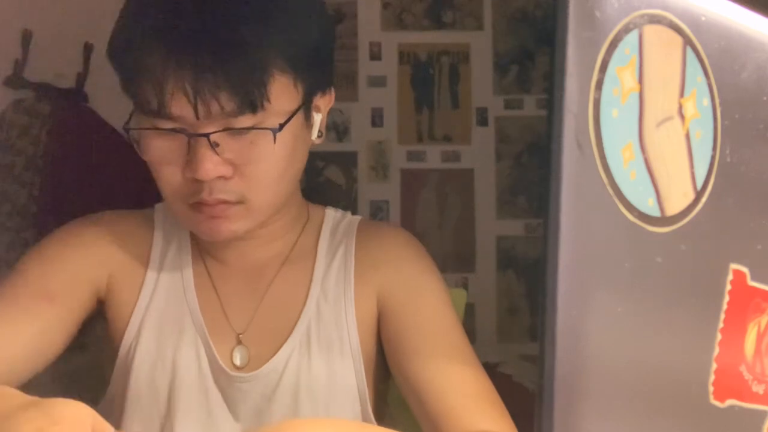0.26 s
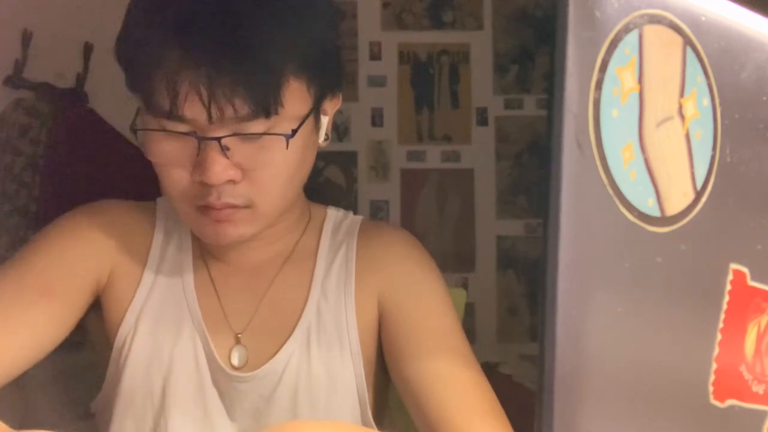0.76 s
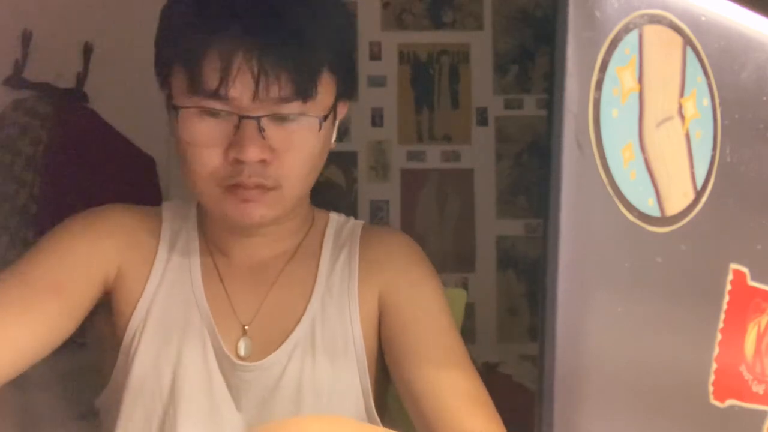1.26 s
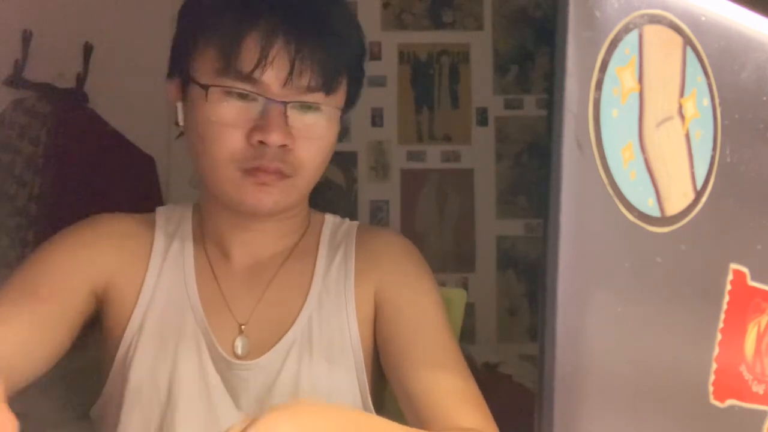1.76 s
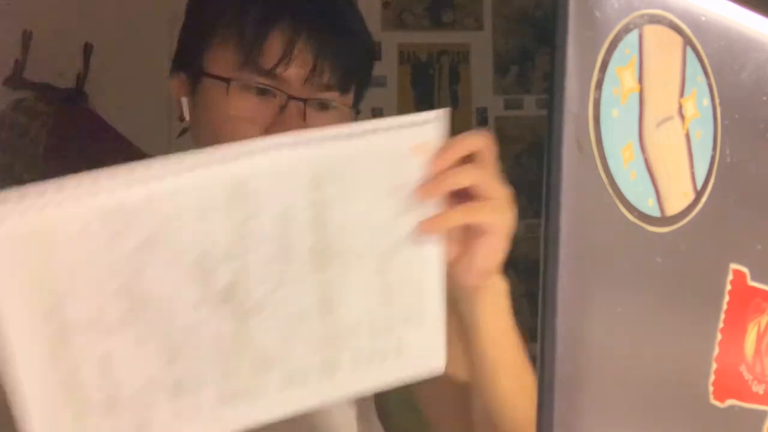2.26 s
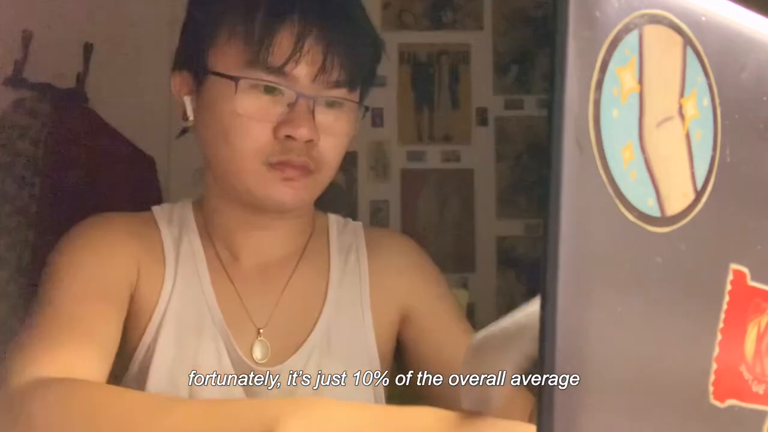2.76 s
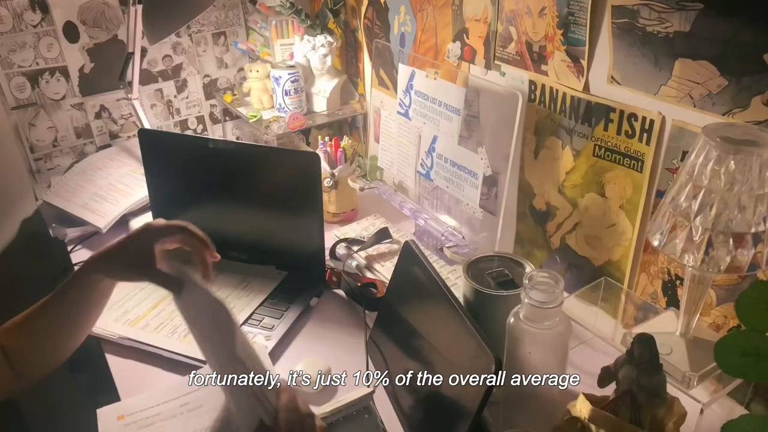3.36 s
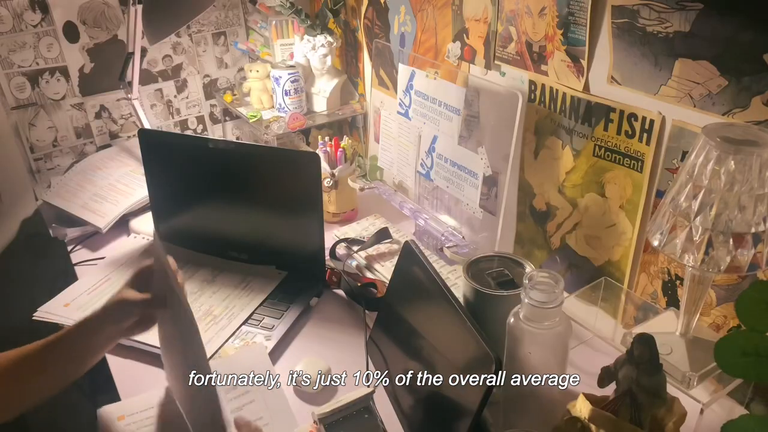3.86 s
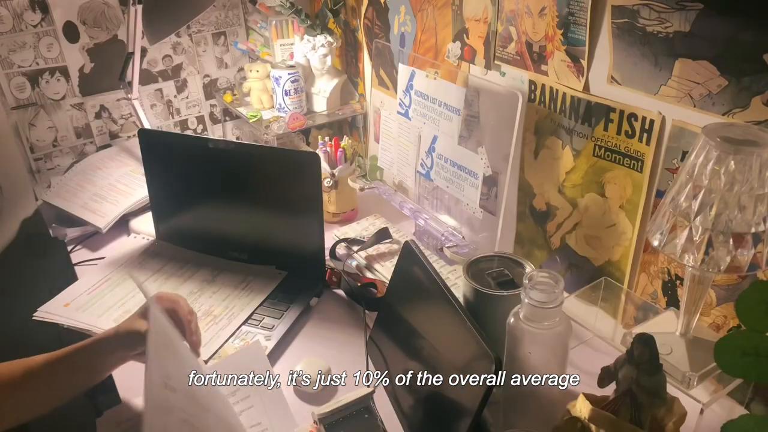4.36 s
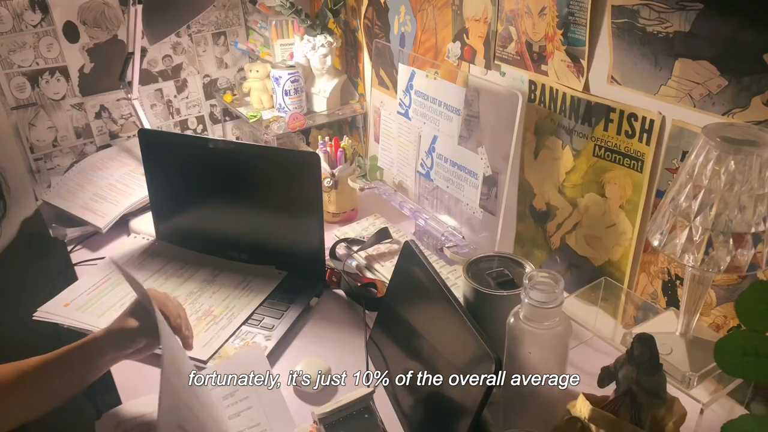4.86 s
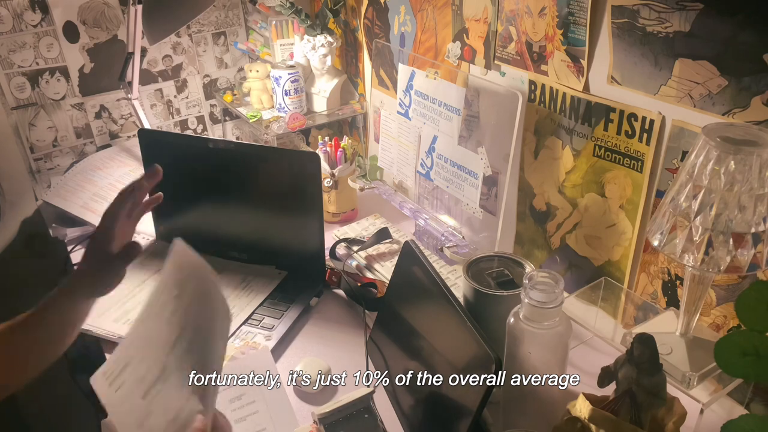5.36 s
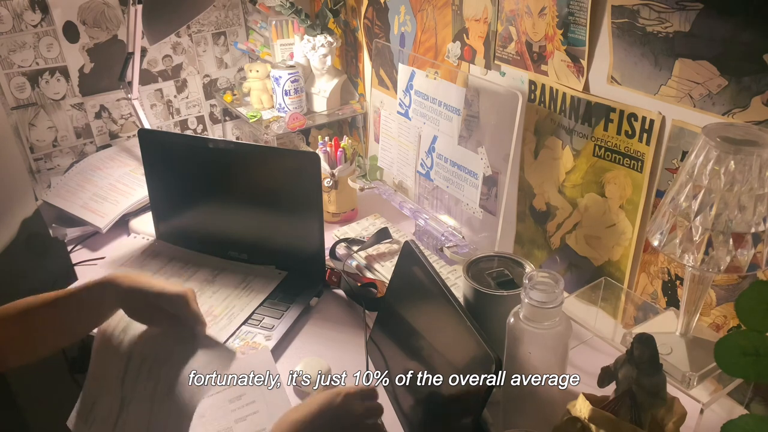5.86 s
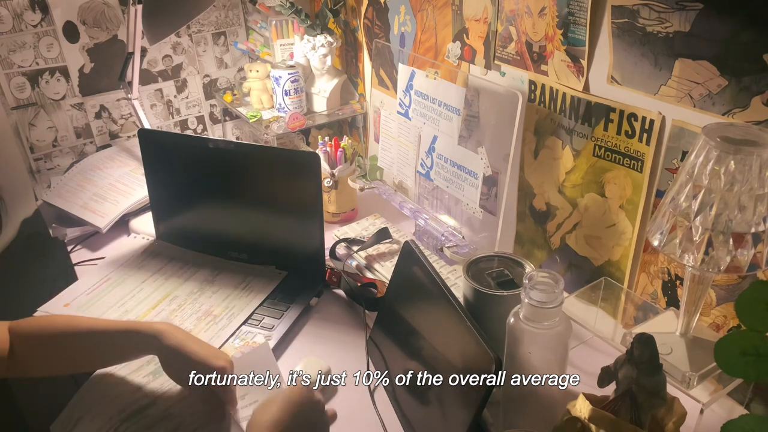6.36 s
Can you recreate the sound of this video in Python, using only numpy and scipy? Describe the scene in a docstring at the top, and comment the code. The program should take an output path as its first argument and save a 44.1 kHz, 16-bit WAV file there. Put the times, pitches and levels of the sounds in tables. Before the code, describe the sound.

In a small room with low street rumble, a faint drone and a distant engine, tiny plastic parts click and scrape. A loud, hard double clack booms the desk at one second. A sheet slides out with bumps and scuffs. The sound then cuts to a softer background, with pages rubbing and flapping close to the stereo microphone, one sharp snap, and a sheet slapped onto the desk.

```python
"""Paper handling at a desk in a small room, over a street rumble, a low drone and an engine heard early and again later.
Small plastic clicks (noise bursts coloured by resonances) lead to loud clacks that boom the desk's low modes at 1 s.
A sheet slides out (clumps of random tiny snaps) and bumps the desk, among duller scuffs and knocks on and around it.
At 3.14 s the sound cuts to a second shot with another stereo sound and a softer rumble; pages rub, rasp and snap.
The loudest snap comes at 6.07 s, and near the end a sheet is slapped down on the desk (coloured noise bursts)."""
import sys
import numpy as np
from scipy import signal
from scipy.fft import rfft, irfft, next_fast_len
from scipy.io import wavfile
from scipy.ndimage import uniform_filter1d

SR = 44100
rng = np.random.default_rng(int(sys.argv[2]) if len(sys.argv) > 2 else 0)


def to_wav(s):
    """Save 16-bit WAV."""
    ch = np.atleast_2d(s).T  # columns
    pcm = np.round(np.clip(ch, -1, 1) * 32767)  # PCM
    wavfile.write(sys.argv[1], SR, pcm.astype(np.int16))


N = 291942  # length in samples

CUT_S = 3.14  # the sound cuts to a second shot
ROOM_BUILD_S = 0.0046  # the room's echoes take this long to thicken
EDGE_HZ = 16100  # top of the recorder's range
DRONE_HZ, DRONE_WIDTH_HZ = 229.4, 36
# a stroke gains speed along a bent quarter sine, then drops FALL_DB in its fall time, slowly at first
PUSH_POWER, BRAKE_POWER, FALL_DB = 1.17, 1.216, 22
TAPS = 4096  # samples in a short filter
HZ = np.fft.rfftfreq(TAPS, 1 / SR)
TIME = np.arange(N) / SR
RING = np.arange(SR // 2) / SR  # half a second, for sounds that die away
CLOCK = np.arange(0, N / SR + .01, .001)  # slow clock in seconds

# In all tables: levels are before the recorder, t60 is the time to fade by 60 dB,
# pan_db is how much louder the left is, and a colour is the balance of pitches, not a loudness.

# colour of the street rumble in the first and second shot: pitch_hz, level_db
RUMBLE_FIRST = [(25, -18), (60, 2), (100, 1), (150, 9.5), (190, -2), (235, 3.5), (320, -3.5), (600, -12.5),
                (1200, -13), (2500, -27.5), (5000, -36), (8000, -51.5), (16000, -53.5)]
RUMBLE_SECOND = [(25, -28), (60, 6.5), (95, -5.5), (145, 5.5), (190, -5.5), (235, 3.5), (320, 0),
                 (600, -10), (1200, -18.5), (2500, -31), (5000, -35.5), (8000, -44), (16000, -44)]
# level of the rumble: time_s, level_db
RUMBLE_LEVEL = [(0, -45.5), (1.2, -46), (1.8, -47), (2.4, -48.5), (3.1, -48.5), (3.5, -51), (4.1, -51),
                (4.9, -52), (5.6, -52), (5.9, -51.5), (6.2, -52), (6.45, -55)]
# a far engine revs and eases off in the street, one list per hearing: time_s, pitch_hz, level_db
REVS = [
    [(0, 234.3, -47), (.16, 225.3, -46.5), (.33, 214.3, -45.5), (.5, 208, -59), (.7, 208, -70)],
    [(3.9, 157.5, -67), (4.1, 158.9, -53), (4.25, 149.6, -57.5), (4.47, 163, -46.5), (4.6, 154, -48),
     (4.72, 140.3, -55), (4.85, 124.2, -55), (5.0, 132.6, -54.5), (5.15, 136, -70.5)],
]
# a low drone comes through the walls and fades: time_s, level_db
DRONE = [(0, -49), (.8, -50), (1.4, -47), (1.9, -51), (2.4, -53.5), (3, -55), (3.4, -64.5), (6.6, -63.5)]
# how long the room rings: pitch_hz, t60_s
ROOM = [(80, .28), (250, .28), (1000, .22), (4000, .22), (10000, .2), (16000, .14)]
# how alike diffuse sound is at left and right: pitch_hz, correlation (1 = the same)
LIKENESS = [(50, 1), (150, .8), (300, 0.3), (700, 0.035), (2000, 0.13), (6000, .15), (16000, .1)]
# how far the left leads in near sound: pitch_hz, lead_radians
LEAD = [(40, 0.17), (150, 1.1), (700, 1.2), (2000, 0.92), (6000, 1.5), (12000, 1.4)]
# knocks on and around the desk; some rows add a broad ring to a clack or to the loud paper snap at 6.07 s:
# start_s, level_db, centre_hz, rattle_t60_s
KNOCKS = [(.487, -51, 615, 0.037), (0.6087, -30.5, 1830, 0.013), (.899, -34, 1750, 0.017),
          (1.0441, -14.5, 1630, 0.037), (1.0829, -14.5, 3300, 0.0067), (1.085, -16, 619, .02),
          (1.872, -45, 2660, 0.022), (1.8962, -41.5, 2180, 0.008), (1.928, -42, 1470, 0.021),
          (1.95, -41.5, 1420, 0.031), (1.995, -40.5, 2200, 0.013), (2.594, -45, 730, 0.034),
          (2.612, -44.5, 800, 0.025), (2.623, -36, 620, 0.022), (2.665, -49, 864, 0.052),
          (2.731, -40.5, 720, 0.041), (2.734, -44, 1600, 0.037), (2.784, -51.5, 2500, .025),
          (2.806, -43, 1100, 0.044), (2.801, -44, 2400, 0.055), (2.825, -48, 1900, 0.037),
          (2.907, -44, 1215, 0.039), (3.108, -44, 1500, 0.027), (3.118, -34, 1760, 0.033),
          (3.124, -38.5, 1200, 0.025), (3.138, -43, 1500, 0.018), (5.411, -40.5, 990, 0.017),
          (5.694, -45, 770, 0.045), (5.775, -50, 800, 0.04), (5.806, -38.5, 995, 0.031),
          (5.816, -50, 1900, 0.019), (5.828, -44, 1400, 0.022), (5.837, -48, 1800, 0.018),
          (5.884, -50.5, 750, 0.016), (6.04, -54, 2040, 0.021), (6.0725, -36, 3120, 0.0074)]
# dull scuffs of things nudged about: start_s, rise_s, fall_s, level_db
SCUFFS = [(1.85, 0.078, 0.35, -49.5), (2.09, 0.16, 0.047, -46.5), (2.57, 0.015, 0.41, -52),
          (2.77, 0.047, 0.2, -49.5), (3.06, 0.017, 0.31, -46.5), (3.83, 0.017, 0.097, -55),
          (4.3, 0.33, 0.11, -59.5), (5.0, 0.076, 0.11, -49), (5.63, 0.19, 0.1, -50.5),
          (6.21, 0.012, 0.15, -54)]
# colour of the scuffs: pitch_hz, level_db
SCUFF_COLOUR = [(200, -4), (450, -14.5), (700, 1.5), (1300, -6), (2200, -12), (3500, -16), (8000, -35),
                (16000, -45)]
# small parts scrape in runs of faint ticks: start_s, rise_s, fall_s, level_db
SCRAPES = [(.46, 0.18, 0.035, -49), (.70, 0.019, 0.071, -47.5), (.89, .015, 0.04, -45.5),
           (1.33, 0.029, 0.2, -44)]
# bumps that set the desk booming: start_s, level_db, most_excited_hz, pan_db
BUMPS = [(0.61, -25.5, 167, 7), (0.65, -28.5, 74.5, 2), (0.926, -27, 77.5, 3.5), (1.044, -11.5, 332, 5),
         (1.081, -6.5, 147.2, 4.5), (1.097, -14, 80.4, 6.5), (1.139, -25.5, 76.5, 2), (1.424, -25, 88, 2),
         (1.528, -23.5, 154, 6), (1.552, -22, 87, 0), (2.0352, -24.5, 130, 7), (2.082, -34, 85.5, 7),
         (2.15, -24.5, 175, 6.5), (2.202, -31, 129, -5), (2.252, -13.5, 137, 5.5), (2.298, -28, 109, -12),
         (2.509, -18, 170, 4.5), (2.56, -30.5, 90, 11), (6.551, -19.5, 202, -5.5)]
# modes of the desk (pitches it rings at): pitch_hz, relative_level_db, t60_s
DESK_MODES = [(68.4, -7.5, 0.39), (90.6, 3, 0.2), (128.4, -1.5, 0.13), (147.8, 5.5, 0.11),
              (178, -4.5, 0.07), (228.2, -9.5, 0.36), (290, -2.5, 0.2), (307, -3.5, 0.16),
              (339, -16.5, 0.38), (575, -27, .15)]
# a small spring rings: start_s, level_db, pitch_hz, t60_s
SPRING_RINGS = [(1.116, -29, 4440, 0.035), (1.149, -44, 4520, 0.026)]
# hard contacts ring a panel or small object: start_s, level_db, centre_hz, width_hz, t60_s, pan_db
CRACKS = [(.4868, -41, 2200, 500, 0.022, -6), (0.6089, -24.5, 1745, 840, 0.014, 2),
          (.611, -24.5, 649, 177, 0.061, -2), (1.0436, -12, 1640, 444, 0.017, 6),
          (1.046, -18, 1680, 160, 0.022, 2), (1.054, -16, 1444, 350, .025, 3),
          (1.0689, -20, 1634, 305.3, 0.02, 2.5), (1.086, -17.5, 1019, 260, .03, -0.5),
          (1.0818, -15.5, 1450, 599, .022, 6), (1.997, -42, 2100, 606, 0.032, 5),
          (2.507, -38.5, 2780, 262, 0.11, 5), (2.597, -40.5, 907, 496, 0.041, -1),
          (2.7156, -47, 1960, 700, 0.044, -5.5), (2.804, -38, 2024, 590, 0.04, -1),
          (3.1197, -32.5, 1446, 447, 0.039, -4), (5.414, -44, 947, 498, 0.037, 0),
          (6.551, -25, 670, 99, 0.058, 4), (6.553, -24.5, 294, 141, 0.13, -2.5)]
# a rubbed edge catches and rasps: start_s, rise_s, fall_s, level_db, centre_hz, width_hz
RASPS = [(1.341, 0.02, 0.047, -40, 615, 190), (1.36, 0.024, 0.023, -46, 4800, 650),
         (1.398, 0.011, 0.032, -34.5, 595, 165), (1.413, 0.051, 0.07, -41.5, 2520, 700),
         (1.72, 0.075, 0.43, -56.5, 3360, 1100), (2.605, 0.0082, 0.098, -43.5, 570, 149),
         (2.77, 0.042, 0.15, -47, 563, 219), (3.315, 0.048, 0.15, -50.5, 4520, 2180),
         (5.7, 0.019, 0.043, -50.5, 3760, 2610), (5.9, 0.14, 0.26, -55.5, 5600, 3000)]
# a sheet slides over the desk: start_s, rise_s, fall_s, level_db (before trim), fizz_db (before fizz trim)
SLIDES = [(1.005, 0.0059, 0.073, -51, -13), (1.335, 0.053, 0.067, -51, 0),
          (1.38, 0.065, 0.067, -38.5, -2.5), (1.49, 0.017, 0.051, -36, 0.5), (1.61, 0.13, 0.058, -59, -8.5),
          (1.74, 0.054, 0.48, -61, -8), (1.98, 0.018, 0.064, -53, -7.5), (2.07, 0.072, 0.22, -52, -2),
          (2.17, 0.086, 0.11, -44, -2), (2.41, 0.12, 0.11, -59.5, -11)]
# colour of the sliding sheet: pitch_hz, level_db
SLIDE_COLOUR = [(200, -7), (700, -8.5), (1000, 7), (1600, 1.5), (2000, 5), (2600, 4.5), (3500, 1.5),
                (5000, 0.5), (5800, 1), (7000, -1.5), (8800, -1.5), (11000, 2.5), (16000, -4)]
# resonances of the sliding sheet: centre_hz, width_hz, above_colour_db
SLIDE_RING = [(1470, 140, 4.5), (2180, 100, 3.5), (2715, 180, 3), (4610, 300, 7), (6424, 730, 2)]
# pages rub in the hand: start_s, rise_s, fall_s, level_db (before trim), fizz_db (before fizz trim)
LEAFING = [(3.04, 0.064, 0.044, -57, -6), (3.135, 0.006, 0.24, -58.5, 1), (3.265, 0.034, 0.35, -51, 2.5),
           (3.40, 0.025, 0.16, -71.5, 21), (3.545, 0.034, 0.067, -55.5, 5.5),
           (3.84, 0.12, 0.058, -64, -1.5), (3.965, 0.022, 0.14, -46, 1), (4.05, 0.046, 0.54, -60, 0),
           (4.305, 0.03, 0.1, -53, 2.5), (4.37, 0.17, 0.11, -56.5, 1.5), (4.70, 0.036, 0.22, -57.5, 3),
           (4.975, 0.094, 0.14, -52, 2), (5.135, 0.047, 0.041, -55.5, 2), (5.2, 0.044, 0.054, -59.5, 2.5),
           (5.319, 0.0041, 0.066, -56.5, -15), (5.455, 0.0048, 0.05, -55, -10.5),
           (5.61, 0.11, 0.044, -62.5, 2), (5.76, 0.033, 0.04, -65.5, 1.5), (5.83, 0.29, 0.089, -59, 4),
           (6.205, 0.072, 0.21, -72.5, -0.5), (6.52, 0.022, 0.032, -51, -15)]
# colour of the pages: pitch_hz, level_db
LEAF_COLOUR = [(200, -6), (600, 0.5), (1200, 0.5), (2500, -4), (4000, -1.5), (7000, -2), (10500, 2),
               (12500, 0), (16000, -1.5)]
# a sheet flaps and lands: start_s, level_db, tilt_db_per_octave, flutter_t60_s, pan_db
FLAPS = [(3.288, -31.5, -9.5, 0.29, -4), (3.986, -29.5, 1, 0.084, -2), (6.5392, -18.5, 5, 0.053, -0.5),
         (6.549, -16, 2, 0.029, -4), (6.561, -20.5, 2.5, 0.087, 3.5)]
# colour of the flaps: pitch_hz, level_db
FLAP_COLOUR = [(50, -12), (140, 8), (190, 9.5), (270, 11), (350, 9.5), (520, 6), (680, 9.5), (880, -3),
               (1200, -5), (2500, -14.5), (6000, -18.5), (8500, -25.5), (11000, -16), (16000, -20.5)]
# stiff paper snaps as it flexes: start_s, level_db, tilt_db_per_octave, rattle_t60_s, pan_db
SNAPS = [(3.0945, -40.5, -4, 0.038, 9), (3.2875, -34, -3, 0.0067, 0), (3.907, -59, -2, 0.011, 2),
         (4.168, -55, 1.5, 0.014, 7.5), (5.015, -48, -6.5, .012, -2), (5.058, -36, -3.5, 0.069, -1),
         (5.3222, -47, 1, 0.0088, 1), (5.4556, -43.5, -5, 0.0053, 3), (6.0728, -18.5, 8, 0.0092, 0.5),
         (6.216, -47, -5.5, 0.024, 3)]
# colour of the snaps: pitch_hz, level_db
SNAP_COLOUR = [(200, 5), (900, -8), (1800, 3), (3300, 3.5), (4300, -3), (6500, 2), (8500, -9.5), (10700, 6),
               (13500, -2), (16000, 0)]
# a small plastic part is fiddled with: start_s, level_db, tilt_db_per_octave, rattle_t60_s, pan_db
TICKS = [(.4255, -46, -3, 0.036, 3), (.446, -56, -6, 0.01, 10), (.472, -36.5, -8.5, 0.036, 5),
         (.486, -38, -5, 0.023, 4), (.5262, -47, -5.5, 0.02, -1), (.547, -43, -5.5, 0.012, -0.5),
         (.569, -46, -9, 0.019, 1), (.586, -47, -3, 0.013, 7), (.595, -44.5, 0.5, 0.03, 3),
         (.705, -46, -6, 0.018, 0), (.7208, -43, -4, 0.026, 2), (.734, -48.5, -2, 0.014, 0),
         (.7522, -42.5, -3, 0.01, 0.5), (.873, -51, -5, 0.014, 0), (.893, -38.5, -4.5, 0.051, 4.5),
         (.8985, -33, -5, 0.035, 0), (.916, -41.5, -3, 0.041, 1), (1.044, -20.5, 7, 0.0087, -5.5)]
# colour of the small part: pitch_hz, level_db
TICK_COLOUR = [(200, -4.5), (900, -6.5), (1800, 0), (3300, -3.5), (4600, -5.5), (6500, -3.5), (8500, -4.5),
               (10700, -4.5), (13500, -1), (16000, 0.5)]
# resonances of the small part: centre_hz, width_hz, above_colour_db
TICK_RING = [(1460, 100, 5.5), (1780, 150, 8.5), (2634, 200, 14), (3580, 120, 8), (4170, 200, 6.5),
             (5110, 300, 13.5), (6430, 340, 13), (7080, 150, 7), (8600, 500, 10)]
# hard plastic clacks: start_s, level_db, tilt_db_per_octave, rattle_t60_s, pan_db
CLACKS = [(.4865, -35, -5, 0.011, 1), (.6085, -31.5, 1.5, 0.018, 3.5), (1.0148, -34, 4, 0.023, 4),
          (1.033, -25, 3, 0.077, 7), (1.0437, -12, 4, 0.0063, 3), (1.0535, -12.5, -1.5, 0.033, -4),
          (1.069, -17.5, 1.5, 0.03, 8.5), (1.0825, -12.5, 2, 0.009, 1), (1.087, -19, -4.5, 0.036, -11.5),
          (1.303, -34, 0, 0.011, 0.5), (1.457, -27.5, 7, 0.13, 1), (1.508, -28.5, 5, 0.061, 0.5),
          (1.52, -39, 5, 0.023, -2), (2.153, -39.5, 3.5, 0.07, -2), (2.2445, -28.5, 2.5, 0.044, 1),
          (2.5035, -29.5, 4.5, 0.041, 4)]
# colour of the plastic: pitch_hz, level_db
PLASTIC_COLOUR = [(60, 1), (250, 2), (420, -15.5), (600, -0.5), (780, -5.5), (1200, -1.5), (1650, -2.5),
                  (2050, -3), (3200, -12.5), (4800, -21.5), (7000, -20), (9000, -27.5), (12000, -25.5),
                  (16000, -32)]
# resonances of the plastic shell: centre_hz, width_hz, above_colour_db
SHELL = [(607, 170, 10), (650, 120, 2.5), (857, 23, 8), (1040, 99, 12.5), (1470, 41, 3.5), (1500, 32, -1),
         (1704, 98, 4.5), (2750, 300, 6.5), (3400, 200, 0.5)]
# the recorder colours the sum (mid) and difference (side) of its ports, in the first and second shot:
# pitch_hz, change_db
MID_FIRST = [(7000, 0), (8000, -7), (9300, -15.5), (10300, -1.5), (16000, 0)]
SIDE_FIRST = [(100, 1.5), (250, -0.5), (600, 4), (1000, -1), (2000, -1), (4000, 0), (7000, 2), (8500, 7.5),
              (10000, 8.5), (11400, 0), (13000, -14.5), (16000, -18)]
MID_SECOND = [(2000, -0.5), (5300, -3), (7600, 1), (8600, -8.5), (9400, 3), (10400, 1.5), (12300, -2.5),
              (13300, -27), (14500, -3), (16000, -2)]
SIDE_SECOND = [(100, 0.5), (250, -4.5), (600, -2.5), (1800, 2), (5000, 0.5), (6400, -4), (8400, 10),
               (10000, 4.5), (11000, -28), (12000, -1.5), (14300, 2), (16000, -21)]


def amp(db):
    """Turns decibels into a multiplier."""
    return 10 ** (np.asarray(db) / 20)


def unit(x):
    """Scales a sound to an rms (average strength) of 1."""
    return x / np.sqrt(np.mean(x ** 2) + 1e-20)


def read(points, hz):
    """Reads a table between its points, along a logarithmic pitch axis."""
    f, value = np.transpose(points)
    return np.interp(np.log(hz + 1), np.log(f), value)


def add(mix, s, sound):
    """Mixes a stereo sound in at time s."""
    part = mix[:, max(round(s * SR), 0):][:, :sound.shape[1]]
    part += sound[:, :part.shape[1]]


def convolve(sound, response):
    """Passes a sound through a response and keeps the sound's length."""
    return signal.oaconvolve(sound, response, axes=1)[:, :sound.shape[1]]


def panned(x, pan_db):
    """Tips the balance to the left."""
    return x * amp([[pan_db / 2], [-pan_db / 2]])


def switched(first, second):
    """Cuts from the first shot to the second within 20 ms."""
    share = np.clip((TIME - CUT_S) / .02 + .5, 0, 1)
    return first * (1 - share) + second * share


def diffuse(size):
    """Makes white stereo noise whose bass is alike in both ports."""
    a, b = rfft(rng.standard_normal((2, size)))
    same = np.clip(read(LIKENESS, np.fft.rfftfreq(size, 1 / SR)), -1, 1)
    return irfft([a, same * a + np.sqrt(1 - same ** 2) * b], size)


def ports(x):
    """Sends near sound to the two microphone ports with a shift of phase between them."""
    size = next_fast_len(len(x) + TAPS)
    turn = np.exp(.5j * read(LEAD, np.fft.rfftfreq(size, 1 / SR)))
    return irfft(rfft(x, size) * np.array([turn, turn.conj()]), size)[:, :len(x)]


def coloured(x, spectrum):
    """Gives a steady sound a colour."""
    size = next_fast_len(x.shape[1])
    gain = amp(read(spectrum, np.fft.rfftfreq(size, 1 / SR)))
    return irfft(rfft(x, size) * gain, size)[:, :x.shape[1]]


def pulse(db):
    """Makes the pulse of energy 1 that has this colour and starts at once."""
    log_gain = np.log(amp(np.r_[db, db[-2:0:-1]]))
    shape = irfft(np.exp(signal.hilbert(log_gain).conj())[:len(HZ)])
    return shape / np.linalg.norm(shape)


def material(spectrum, resonances=()):
    """Builds a broad colour with resonances standing out of it, in dB."""
    return read(spectrum, HZ) + sum(db / (1 + (2 * (HZ - hz) / width) ** 2) for hz, width, db in resonances)


def tilted(colour, tilt_db):
    """Tips a colour by so many dB an octave above 200 Hz."""
    return colour + tilt_db * np.log2(np.maximum(HZ, 200))


def peak(hz, centre_hz, width_hz):
    """Shapes one steep-sided resonance, in dB."""
    return np.maximum(-20 * np.log10(1 + (2 * (hz - centre_hz) / width_hz) ** 2), -80)


def room_tail():
    """Makes a fresh stereo room echo from fading noise; its highest pitches die first."""
    hz, t, z = signal.stft(diffuse(len(RING)), SR, nperseg=256)
    fade = amp(-60 * t / read(ROOM, hz)[:, None])
    tail = signal.istft(z * fade, SR, nperseg=256)[1][:, :len(RING)]
    return unit(tail * (1 - np.exp(-RING / ROOM_BUILD_S))) / np.sqrt(len(RING))


def reflections(near_db=-5, span_s=.009, count=7):
    """The direct path plus first echoes off the desk top and the things on it, different at each port."""
    size = int(span_s * SR) + 32
    taps = np.zeros((2, size))
    at = 24 + (rng.random((2, count)) ** 2 * (size - 32)).astype(int)  # squaring crowds echoes early
    np.put_along_axis(taps, at, rng.choice([-1., 1.], at.shape) * amp(near_db) / np.sqrt(count), 1)
    # small things reflect little bass
    taps = signal.sosfilt(signal.butter(1, 700, "high", fs=SR, output="sos"), taps)
    taps[:, 0] = 1
    return taps / np.linalg.norm(taps[0])


def stroke(start, rise, fall):
    """The speed of one stroke, 0 to 1: the hand pushes, then lets the paper come to rest."""
    push = np.sin(np.pi / 2 * np.clip((CLOCK - start) / rise, 0, 1)) ** PUSH_POWER
    return push * amp(-FALL_DB * np.clip((CLOCK - start - rise) / fall, 0, 10) ** BRAKE_POWER)


def swells(strokes):
    """The level through time of strokes that may overlap; their powers add."""
    power = sum((amp(db) * stroke(start, rise, fall)) ** 2 for start, rise, fall, db in strokes)
    return np.interp(TIME, CLOCK, np.sqrt(power))


def blow(db, t60, rattle_db, wet_db, rise):
    """One contact, a short noisy rattle and the room, all in the colour of the struck thing."""
    swell = amp(-60 * RING / t60) * (1 - np.exp(-RING / rise))
    contact = amp(rattle_db) * unit(rng.standard_normal(len(RING)) * swell) / np.sqrt(len(RING))
    contact[0] += 1  # the contact itself
    near = convolve(ports(contact / np.linalg.norm(contact)), reflections())
    heard = near + amp(wet_db) * room_tail()
    # table levels are rms over 5 ms
    return signal.fftconvolve(heard, pulse(db)[None], axes=1) * np.sqrt(SR / 200)


def street(waver=0.2, octave_db=-22):
    """Rumble (coloured noise) and a far engine (a gliding tone with its octave) come from outside."""
    noises = [coloured(diffuse(next_fast_len(N))[:, :N], c) for c in (RUMBLE_FIRST, RUMBLE_SECOND)]
    rumble = amp(np.interp(TIME, *np.transpose(RUMBLE_LEVEL))) * switched(unit(noises[0]), unit(noises[1]))
    flutter = unit(uniform_filter1d(uniform_filter1d(rng.standard_normal(N), 1500), 1500))
    engine = np.zeros(N)
    for rev in REVS:
        s, hz, db = np.transpose(rev)
        turns = np.cumsum(np.interp(TIME, s, hz)) / SR
        level = np.interp(TIME, s, amp(db), left=0, right=0)
        tone = np.sin(2 * np.pi * turns)
        octave = amp(octave_db) * np.sin(2 * np.pi * 2 * turns)
        engine += level * (tone + octave)
    outside = rumble + (1 + waver * flutter) * engine
    return switched(panned(outside, pan_db=1.0), panned(outside, pan_db=-3.0))


def drone():
    """A narrow band of low noise, so its pitch and level waver."""
    size = next_fast_len(N)
    gain = amp(peak(np.fft.rfftfreq(size, 1 / SR), DRONE_HZ, DRONE_WIDTH_HZ))
    band = irfft(rfft(diffuse(size)) * gain, size)[:, :N]
    return amp(np.interp(TIME, *np.transpose(DRONE))) * panned(unit(band), 2.2)


def dull_knocks(dull_ratio=1.115, body_db=-14, softness=0.083, rattle_db=16):
    """Each knock rings one broad resonance over a dull body; longer ones have more rattle and room."""
    q = 2.2  # sharpness of the resonance
    out = np.zeros((2, N))
    for s, db, hz, t60 in KNOCKS:
        ratio = (HZ + 1) / hz
        resonance = 1 / (1 + (q * (ratio - 1 / ratio)) ** 2)
        body = amp(2 * body_db) * HZ ** 2 / (HZ ** 2 + 250 ** 2)
        colour = 10 * np.log10((resonance + body) / (1 + (ratio / dull_ratio) ** 6))
        length_db = 10 * np.log10(t60 / .12)
        add(out, s, amp(db) * blow(colour, t60, rattle_db + length_db, length_db, softness * t60))
    return out


def patter(strokes, colour, taps_per_s, spread_db, wet_db, pan_db):
    """Faint random taps under each stroke, all in one colour and heard with the room."""
    sizes = amp(spread_db * np.minimum(rng.exponential(1, N), 4))
    taps = rng.choice([-1., 1.], N) * sizes * (rng.random(N) < taps_per_s / SR)
    heard = ports(taps) + amp(wet_db) * convolve(taps[None], room_tail())
    return panned(swells(strokes) * unit(convolve(heard, pulse(colour)[None])), pan_db)


def desk(reach_db=9, rise=0.0043, wet_db=-7):
    """Bumps ring the desk's low modes, favouring those near the pace of the push."""
    out = np.zeros((2, N))
    hz, mode_db, t60 = np.transpose(DESK_MODES)[:, :, None]
    for s, db, centre_hz, pan_db in BUMPS:
        share = amp(mode_db - reach_db * np.log2(hz / centre_hz) ** 2)
        share /= np.linalg.norm(share)
        modes = share * amp(-60 * RING / t60) * np.sin(2 * np.pi * hz * RING)
        boom = amp(db) * modes.sum(0) * (1 - np.exp(-RING / rise))
        echo = convolve(boom[None], room_tail())
        add(out, s, panned(ports(boom) + amp(wet_db) * echo, pan_db))
    return out


def spring():
    """A small spring makes brief, fading high tones just after the big clack."""
    out = np.zeros((2, N))
    for s, db, hz, t60 in SPRING_RINGS:
        tone = amp(db - 60 * RING / t60) * np.sin(2 * np.pi * hz * RING)
        add(out, s, panned(ports(tone), 8))
    return out


def cracks(wet_db=-11, softness=0.027):
    """A hard contact sets four close panel modes ringing; they swell for an instant and die away."""
    out = np.zeros((2, N))
    t = RING[:TAPS]
    for s, db, hz, width, t60, pan_db in CRACKS:
        modes = hz + width * (np.arange(4) + rng.random(4) - 2) / 4
        swell = amp(-60 * t / t60) * (1 - np.exp(-t / (softness * t60)))
        ring = np.sin(2 * np.pi * modes[:, None] * t).sum(0) * swell
        ring *= np.sqrt(SR / 200) / np.linalg.norm(ring)  # table levels are rms over 5 ms
        add(out, s, amp(db) * panned(ports(ring), pan_db))
        add(out, s, amp(db + wet_db) * signal.fftconvolve(ring[None], room_tail(), axes=1))
    return out


def rasps(slips_per_s=3000, wet_db=-8, pan_db=-1.5):
    """Uneven slips of a paper edge ring one resonance while the stroke lasts."""
    out = np.zeros((2, N))
    size = len(RING)
    for start, rise, fall, db, hz, width in RASPS:
        slips = rng.standard_normal(size) * (rng.random(size) < slips_per_s / SR)
        heard = ports(slips) + amp(wet_db) * convolve(slips[None], room_tail())
        speed = np.interp(start + RING, CLOCK, stroke(start, rise, fall))
        rasp = speed * convolve(heard, pulse(peak(HZ, hz, width))[None])
        add(out, start, amp(db) * unit(rasp) * np.sqrt(np.mean(speed ** 2)))
    return panned(out, pan_db)


def friction(strokes, colour, grains_per_s, spread_db, scatter, pan_db, trim_db, fizz_db, wet_db, clump_db=5.5):
    """Paper fibres catch and slip in clumps of tiny snaps; a treble fizz has its own level per stroke."""
    clumps = unit(uniform_filter1d(uniform_filter1d(rng.standard_normal(N), 400), 400))
    sizes = amp(spread_db * np.minimum(rng.exponential(1, N), 4) + clump_db * clumps)
    snaps = rng.choice([-1., 1.], N) * sizes * (rng.random(N) < grains_per_s / SR)
    opposed = rng.random(N) < scatter  # snaps all over a wide sheet often reach the ports out of step
    near = ports(snaps * ~opposed) + np.array([[1], [-1]]) * snaps * opposed
    rub = np.zeros((2, N))
    for k in range(3):  # the sheet moves, so its echoes keep changing
        share = np.maximum(np.cos(2 * np.pi * (2.3 * TIME - k / 3)), 0)
        rub += convolve(near * share, reflections())
        rub += amp(wet_db) * convolve((snaps * share)[None], room_tail())
    rub = convolve(rub, pulse(colour)[None])
    # split at 8500 Hz
    body = unit(signal.sosfilt(signal.butter(6, 8500, "low", fs=SR, output="sos"), rub))
    fizz = unit(signal.sosfilt(signal.butter(6, 8500, "high", fs=SR, output="sos"), rub))
    body_level = swells([(start, rise, fall, db + trim_db) for start, rise, fall, db, top_db in strokes])
    fizz_level = swells([(start, rise, fall, db + top_db + fizz_db)
                         for start, rise, fall, db, top_db in strokes])
    return panned(body_level * body + fizz_level * fizz, pan_db)


def hits(rows, spectrum, rattle_db, wet_db, softness, resonances=()):
    """Blows on one material, each tilted dull or bright; longer rattles start more softly."""
    out = np.zeros((2, N))
    body = material(spectrum, resonances)
    for s, db, tilt_db, t60, pan_db in rows:
        colour = tilted(body, tilt_db)
        add(out, s, panned(amp(db) * blow(colour, t60, rattle_db, wet_db, softness * t60), pan_db))
    return out


def scene():
    """Adds up everything on and around the desk."""
    scuffs = patter(SCUFFS, material(SCUFF_COLOUR), taps_per_s=220, spread_db=2.5, wet_db=12.5, pan_db=0.5)
    scrape_colour = tilted(material(TICK_COLOUR, TICK_RING), tilt_db=-5)
    scrapes = patter(SCRAPES, scrape_colour, taps_per_s=210, spread_db=2.0, wet_db=-13.0, pan_db=-1.5)
    slide = friction(SLIDES, material(SLIDE_COLOUR, SLIDE_RING), grains_per_s=2000, spread_db=3.0,
                     scatter=0.082, pan_db=2.0, trim_db=3.0, fizz_db=2.5, wet_db=2.0)
    pages = friction(LEAFING, material(LEAF_COLOUR), grains_per_s=2200, spread_db=1.5,
                     scatter=0.3, pan_db=0.0, trim_db=5, fizz_db=3, wet_db=2)
    flaps = hits(FLAPS, FLAP_COLOUR, rattle_db=14, wet_db=-5, softness=0.035)
    snaps = hits(SNAPS, SNAP_COLOUR, rattle_db=7.0, wet_db=-12.5, softness=0.009)
    ticks = hits(TICKS, TICK_COLOUR, rattle_db=2.5, wet_db=-8, softness=0.013, resonances=TICK_RING)
    clacks = hits(CLACKS, PLASTIC_COLOUR, rattle_db=9.5, wet_db=-7.5, softness=0.03, resonances=SHELL)
    background = street() + drone() + dull_knocks() + scuffs + scrapes
    paper = slide + pages + rasps() + flaps + snaps
    return background + paper + desk() + spring() + cracks() + ticks + clacks


def record(dry):
    """The recorder's stereo processing, low cut, soft overload and band limit."""
    mid, side = (dry[:1] + dry[1:]) / 2, (dry[:1] - dry[1:]) / 2
    mid = switched(coloured(mid, MID_FIRST), coloured(mid, MID_SECOND))
    side = switched(coloured(side, SIDE_FIRST), coloured(side, SIDE_SECOND))
    wide = np.vstack([mid + side, mid - side])
    cut = signal.sosfilt(signal.butter(3, 42, "high", fs=SR, output="sos"), wide)
    limited = cut / (1 + cut ** 4) ** .25  # rounds off peaks near full scale
    band_limit = signal.firwin(511, EDGE_HZ, window=("kaiser", 9), fs=SR)
    return signal.oaconvolve(limited, band_limit[None], "same")


dry = scene()
out = record(dry)
to_wav(out)
```